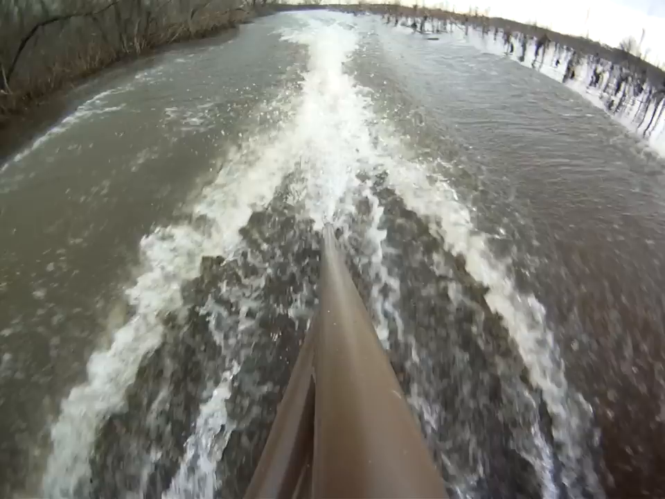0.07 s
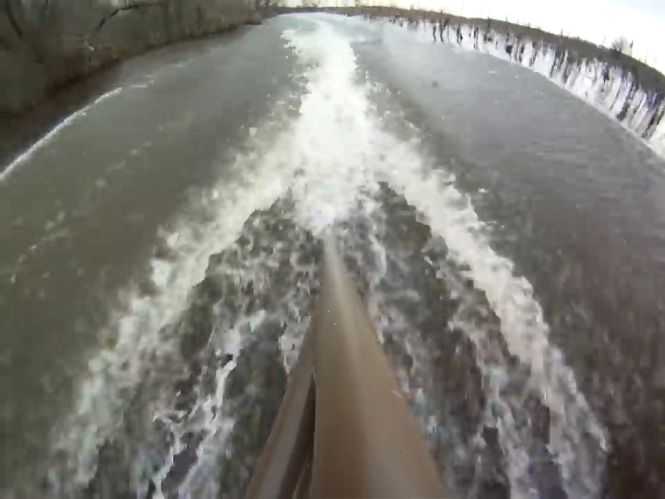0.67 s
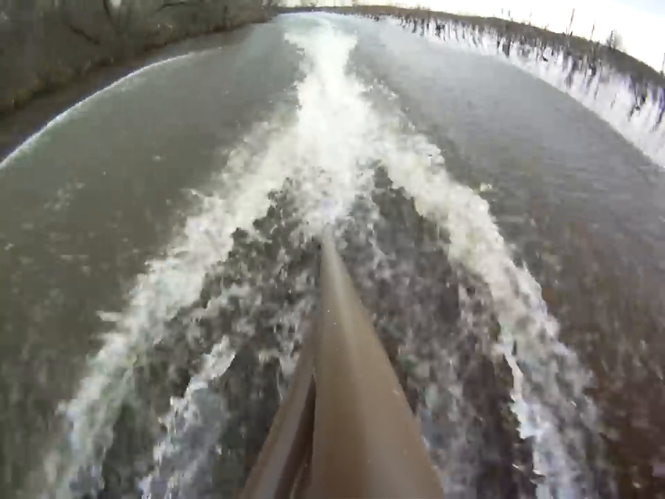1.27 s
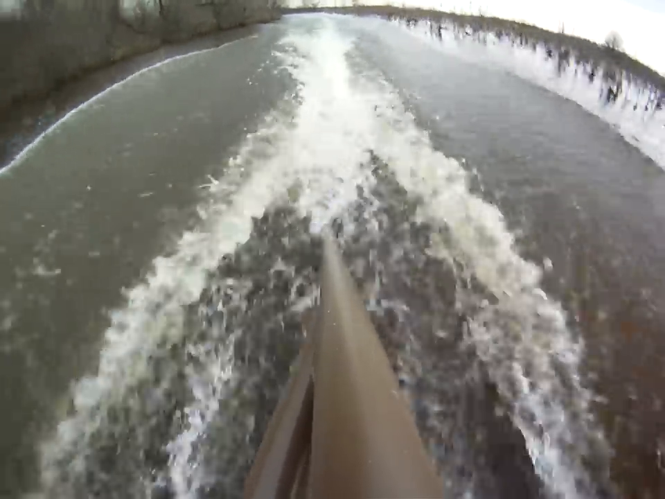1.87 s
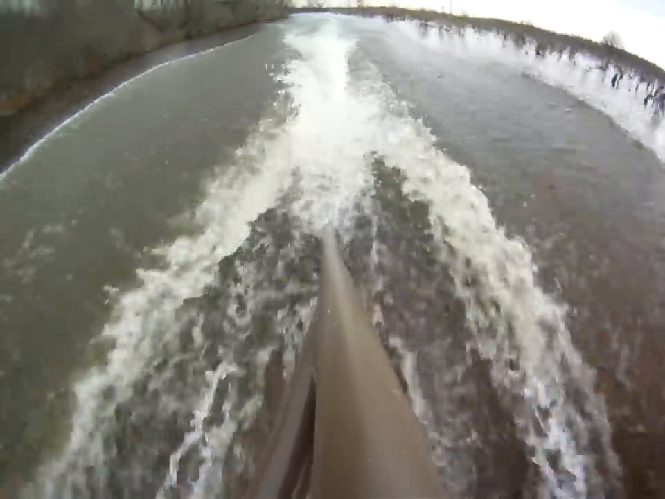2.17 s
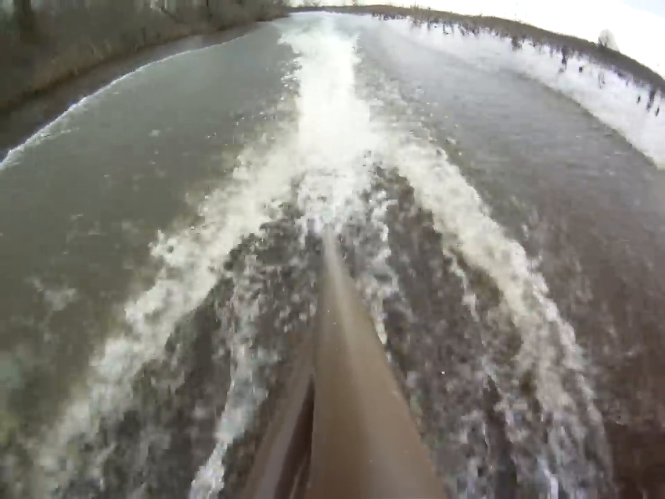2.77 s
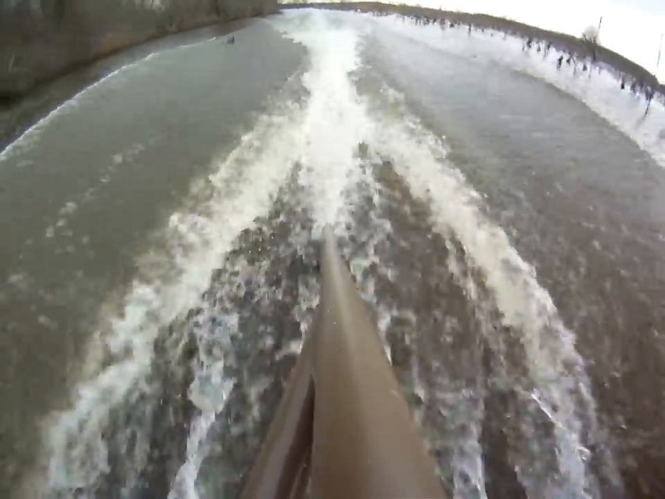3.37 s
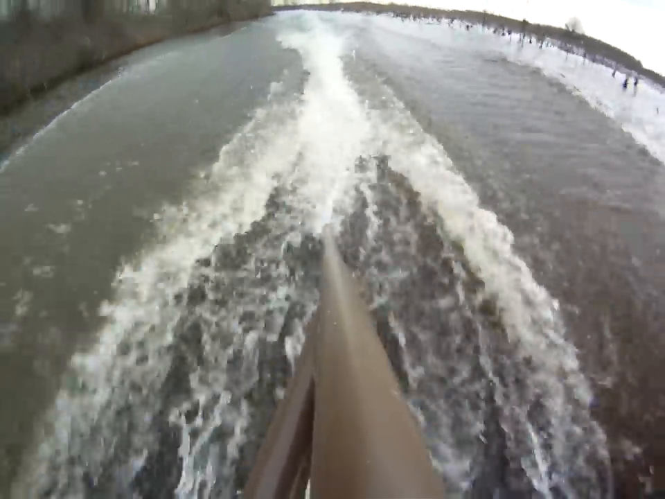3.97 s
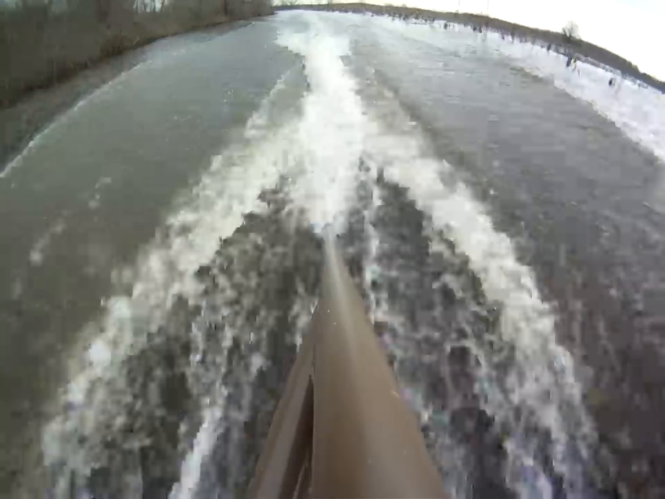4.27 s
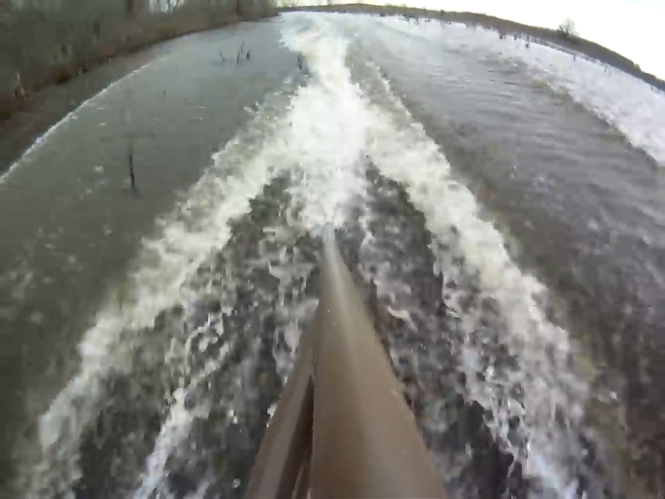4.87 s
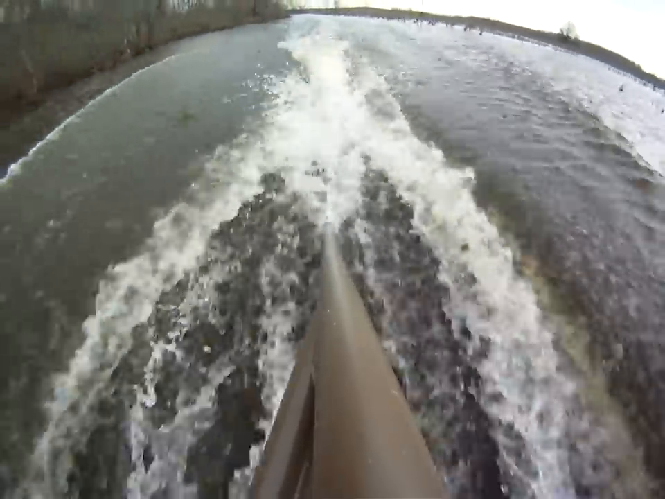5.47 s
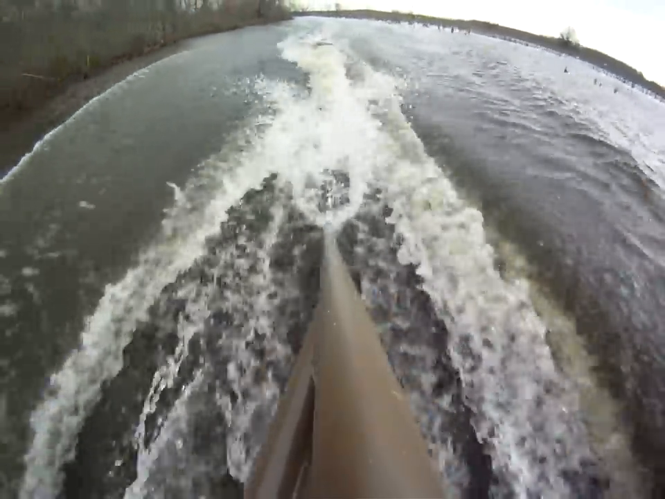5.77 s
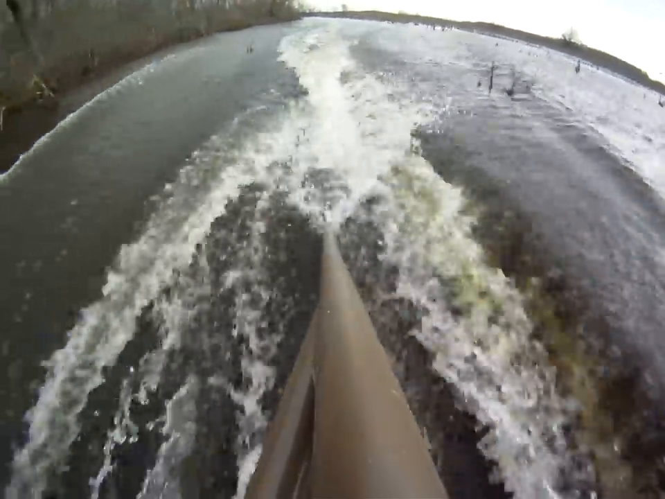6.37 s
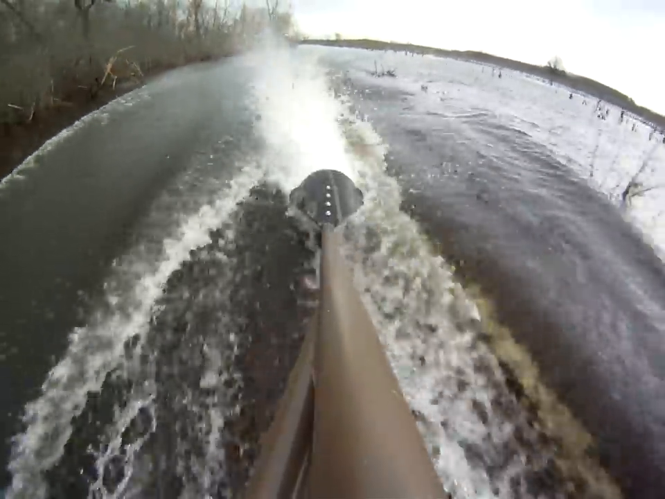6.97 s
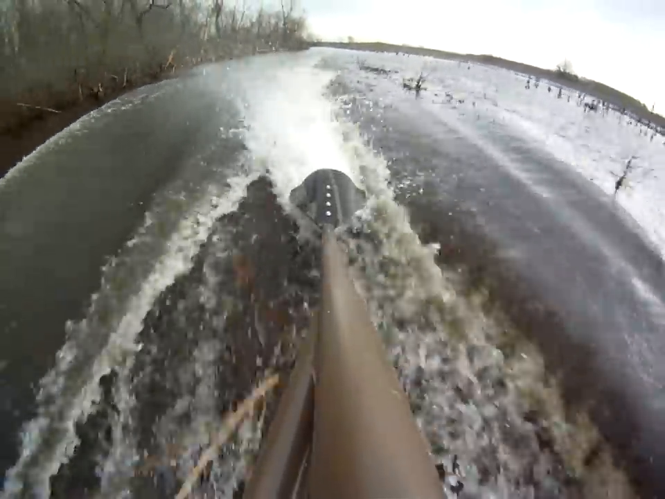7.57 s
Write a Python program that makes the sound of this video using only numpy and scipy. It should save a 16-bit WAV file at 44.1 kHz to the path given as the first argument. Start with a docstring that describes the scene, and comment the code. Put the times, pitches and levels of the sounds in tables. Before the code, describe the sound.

Heard from a microphone fixed to the propeller shaft, a boat engine drones steadily outdoors, its rapid thumping mixed with rattling metal, churning water and a thin high fizz. Late on, the propeller comes up to the surface and partly out: the deep water rumble falls away, the engine speed dips and wobbles a little, and the sound turns thinner, with more metallic ringing.

```python
"""A V-twin mud motor drives a boat over shallow flooded ground, heard from a cased camera on its tail shaft.
From the start, uneven firings drone and thump through the frame, valves and bearings clatter into the
tube and case, and the propeller churns. At 5 to 5.7 s it rises to the surface and the water rumble fades.
By 6.9 s it is half out: the thump is weaker, the shaft shakes and rings.
Throughout, the camera's slow sample-and-hold adds a fizz."""
import sys
import numpy as np
from scipy import signal
from scipy.fft import rfft, irfft, next_fast_len
from scipy.io import wavfile
from scipy.ndimage import uniform_filter1d

SR = 44100
rng = np.random.default_rng(int(sys.argv[2]) if len(sys.argv) > 2 else 0)


def wav_out(sig):
    """Save sig, one row per channel (or a flat mono array), as 16-bit PCM at SR to the path in sys.argv[1]."""
    wavfile.write(sys.argv[1], SR, np.round(np.clip(np.atleast_2d(sig).T, -1, 1) * 32767).astype(np.int16))


N = 336042
T = np.arange(N) / SR
MAX_CYCLES = 200

# propeller height: time_s, lift (0 deep, 1 at the surface, 2 half out)
PROP_LIFT = [(0, 0.075), (5.0, 0.04), (5.7, 1.1), (6.55, 1.08), (6.85, 1.878), (7.62, 1.93)]
# shaft tube and camera case resonances: pitch_hz, width_hz, level_db
TUBE_MODES = [(463, 56, -7.5), (622, 130, -2), (727, 175, 1), (839, 104, -1), (950, 83, -6), (1092, 97, -5),
              (1250, 260, -11.5), (1393, 103, -1), (1516, 105, 1), (1668, 81, 0), (1726, 56, 2),
              (1845, 45, 0.5), (1909, 110, -2), (1979, 202, -2.5), (2273, 85, -7.5), (2370, 176, -7),
              (2604, 174, -7), (3050, 120, -18), (3210, 210, -18), (3593, 307, -12), (3847, 126, -14),
              (4067, 176, -15.5), (4360, 160, -27.5)]
# broad response between them: frequency_hz, level_db
CASE_RESPONSE = [(30, -29), (110, -32.5), (200, -1), (400, -8.5), (1300, -7.5), (2150, -28.5), (2880, -46),
                 (4200, -53), (4800, -36.5), (5900, -41)]


def combustion(cycle):
    """Pressure pulses of two unevenly spaced cylinders; burn strength varies."""
    # firings: angle_cycles, level_db
    cylinders = [(0.341, -2), (.715, -3.5)]
    burn = scatter(spread_db=2.0)
    return sum(blows(cycle, angle, undb(db) * burn * scatter(spread_db=1.5), jitter_ms=.3)
               for angle, db in cylinders)


def drone(cycle):
    """Engine tones that crest together after the stronger firing and change with lift."""
    # tones: cycle_multiple (rounded on use), deep_db, surface_db, half_out_db
    tones = [(6, -33.5, -45, -48), (7, -38.5, -46, -56), (8, -37, -28, -26), (10, -23.5, -43, -51),
             (11, -23, -34.5, -36), (12, -27, -21, -28.5), (13, -31, -22.5, -42), (16, -41, -37.5, -50),
             (26, -50, -56, -35), (27, -34.5, -33, -54), (32, -32, -62, -31), (34, -48, -46, -34),
             (42, -54, -51, -30), (59, -37, -44, -37), (63.5, -37, -43, -34), (65.9, -40, -35, -29),
             (72, -34, -36, -45)]
    slip_cycles = 0.00075 * walk(14)
    angle_cycles = cycle - .41 + slip_cycles
    throb_db = surge(14, spread_db=0.7)
    out = 0
    for multiple, *levels_db in tones:
        level_db = by_lift(levels_db) + throb_db + 1.6 * walk(14)
        blur_rad = 0.058 * np.sqrt(multiple) * walk(14)  # crank slip blurs high tones most
        out = out + undb(level_db) * np.cos(2 * np.pi * round(multiple) * angle_cycles + blur_rad)
    return np.sqrt(2) * out


def thump(firings):
    """Each firing knocks the frame; a short rumble of exhaust gas follows."""
    # frame resonances: pitch_hz, width_hz, level_db
    frame_modes = [(71.4, 40, -15), (175, 79, -14), (248.3, 36, -.5), (272.8, 39, 3), (321, 36, -5),
                   (387, 117, -19)]
    # thump weight: deep_db, surface_db, half_out_db
    weight_db = [-22, -25, -30.5]
    gas = fade(firings, ms=6.6) * rng.standard_normal(N)
    frame = ring(undb(-7.5) * unit(firings) + unit(gas), frame_modes)
    return steady(frame, window_s=0.08) * undb(by_lift(weight_db) + surge(22, spread_db=1.8))


def clatter(cycle, firings, contact_count=64):
    """Valve knocks, recurring bearing contacts and a rattle after each firing ring the tube."""
    # valve gear knocks: angle_cycles, level_db
    valves = [(.005, -4.5), (.315, -2), (0.638, -4.5)]
    knocks = sum(blows(cycle, angle, undb(db) * scatter(spread_db=1.0), jitter_ms=0.22)
                 for angle, db in valves)
    knocks = fade(knocks, ms=3.3) * rng.standard_normal(N)
    # hard steel contacts are brighter
    knocks = unit(signal.sosfilt(signal.butter(1, 3000, "high", fs=SR, output="sos"), knocks))
    contacts = zip(rng.random(contact_count), rng.choice([-1, 1], contact_count))
    bearings = sum(blows(cycle, angle, np.full(MAX_CYCLES, sign), jitter_ms=.09)
                   for angle, sign in contacts)
    rattle_envelope = fade(fade(firings, ms=11.5), ms=1.27)
    rattle = unit(rattle_envelope * rng.standard_normal(N))
    force = rattle + undb(-1.5) * unit(bearings) + undb(1.2) * knocks
    return steady(ring(force * undb(0.55 * walk(40)), TUBE_MODES, CASE_RESPONSE), window_s=0.082)


def churn(pops_per_s=4000):
    """The propeller tears the water; collapsing bubbles sound up the tube."""
    pops = rng.standard_normal(N) * (rng.random(N) < pops_per_s / SR)
    pops *= undb(2.3 * np.minimum(rng.exponential(size=N), 3))
    return unit(ring(pops * undb(0.71 * walk(35)), TUBE_MODES, CASE_RESPONSE))


def shaft_shake(cycle):
    """Unbalance shakes the shaft once and twice per crank turn."""
    # once-per-turn shake: time_s, level_db
    shake_level = [(0.06, -31), (0.54, -29), (0.63, -36), (0.9, -23), (1.05, -29), (2.78, -24), (2.9, -28),
                   (3.2, -22), (3.43, -36), (3.68, -27), (3.87, -31.5), (5.87, -27.5), (6.06, -31),
                   (6.23, -20), (6.48, -31.5), (6.61, -18.5), (7.6, -20), (7.62, -18)]
    # twice-per-turn hum: time_s, level_db
    hum_level = [(0, -33.5), (3.0, -31.5), (3.5, -35.5), (4.9, -44), (5.5, -37), (6.4, -38), (6.8, -43),
                 (7.62, -40)]
    shake_db, = curves(shake_level)
    hum_db, = curves(hum_level)
    crank_rad = 4 * np.pi * cycle
    shake = undb(shake_db + surge(18, spread_db=2)) * np.sin(crank_rad)
    hum = undb(hum_db + 1.5 * walk(10)) * np.sin(2 * crank_rad)
    return np.sqrt(2) * (shake + hum)


def shaft_ring(firings):
    """Firings ring the shaft, louder as it leaves the damping water."""
    # free shaft modes: pitch_hz, width_hz, level_db
    shaft_modes = [(985, 123, -6), (1107, 120, -7), (1403, 160, -2.5), (1510, 79, -1.5), (1717, 70, -4)]
    rattle = fade(firings, ms=13) * rng.standard_normal(N)
    return steady(ring(rattle, shaft_modes), window_s=0.081) * undb(by_lift([-42, -31, -20.7]))


def wash():
    """Turbulent water buffets the skeg while it runs deep."""
    # water rumble: time_s, level_db
    rumble_level = [(0, -28), (3.0, -26.5), (4.0, -28.5), (5.0, -30.5), (6.0, -33.5), (7.0, -39),
                    (7.62, -45)]
    # submerged skeg resonances: pitch_hz, width_hz, level_db
    skeg_modes = [(50, 47, -9.5), (149, 23, -1.5), (183, 57, 3.5), (220, 66, -1)]
    rumble_db, = curves(rumble_level)
    return unit(ring(rng.standard_normal(N), skeg_modes)) * undb(rumble_db)


def surge(rate_hz, spread_db):
    """Brief swells in dB from the propeller's uneven bite; they calm as it lifts."""
    lift, = curves(PROP_LIFT)
    swells = walk(rate_hz)
    swells = unit(swells - uniform_filter1d(swells, SR // 2))
    return spread_db * np.exp(-.35 * lift) * np.minimum(swells, 1.3)


def by_lift(levels_db):
    """Level moving between its deep, surface and half-out values."""
    lift, = curves(PROP_LIFT)
    return np.interp(lift, np.arange(3), levels_db)


def ring(x, modes, broad=None):
    """Steep resonances over an optional broad response; minimum phase, so blows ring on."""
    bin_hz = np.arange(4097) * SR / 8192
    power = 1e-7 + sum(undb(2 * db) / (1 + (2 * (bin_hz - hz) / width_hz) ** 2) ** 2
                       for hz, width_hz, db in modes)
    if broad is not None:
        hz, db = np.transpose(broad)
        power = power + undb(2 * np.interp(np.log(bin_hz + 1), np.log(hz), db))
    cepstrum = irfft(np.log(power) / 2)
    causal_fold = 1 + np.sign(len(bin_hz) - 1 - np.arange(len(cepstrum)))
    causal_fold[0] = 1
    impulse = irfft(np.exp(rfft(cepstrum * causal_fold)))
    return signal.fftconvolve(x, impulse)[:N]


def blows(cycle, angle_cycles, sizes, jitter_ms):
    """One click per engine cycle, slightly early or late."""
    due_s = np.interp(np.arange(len(sizes)) + angle_cycles, cycle, T, left=-1, right=-1)
    at = (due_s + jitter_ms / 1000 * rng.standard_normal(len(sizes))) * SR
    inside = (at > 0) & (at < N - 1)
    return np.bincount(at[inside].astype(int), sizes[inside], N)


def fade(x, ms):
    """Exponential tail on each click."""
    return signal.lfilter([1], [1, -np.exp(-1000 / (ms * SR))], x)


def scatter(spread_db):
    """Capped random gain per engine cycle."""
    return undb(spread_db * np.minimum(rng.standard_normal(MAX_CYCLES), 1.4))


def walk(rate_hz):
    """Random levels joined by ramps; rms 1."""
    step = int(SR / rate_hz)
    return unit(uniform_filter1d(np.repeat(rng.standard_normal(2000), step)[:N], step))


def steady(x, window_s):
    """Even out slow swells; rms 1."""
    return x / np.sqrt(uniform_filter1d(x ** 2, int(window_s * SR)) + 1e-9)


def curves(table):
    """Table columns interpolated to every sample."""
    time_s, *columns = np.transpose(table)
    return [np.interp(T, time_s, column) for column in columns]


def undb(db):
    """Decibels to gain."""
    return 10 ** (np.asarray(db) / 20)


def unit(x):
    """Scale to rms 1."""
    return x / np.sqrt(np.mean(x ** 2))


def scene():
    """The engine cycle, two crank turns, times the motor; load and lift weight the mix."""
    # crankshaft speed: time_s, rotation_hz
    crank_speed = [(0.06, 48.01), (0.94, 48.75), (1.74, 48.23), (2.21, 49.12), (3.53, 47.82), (3.66, 48.26),
                   (5.28, 47.56), (5.43, 45.82), (5.51, 46.2), (5.79, 44.21), (5.95, 45.13), (6.1, 44.6),
                   (6.19, 46.27), (6.27, 46.8), (6.54, 44.07), (6.88, 48.5), (7.26, 46.05), (7.62, 46.14)]
    # gains under load: time_s, churn_db, clatter_db, drone_db
    load = [(0, -23, -18.7, 0.5), (.6, -21, -18, -0.5), (1.3, -21.5, -18, 1), (1.65, -23.7, -19.5, -0.5),
            (3.0, -22, -18, -0.5), (3.6, -20.7, -18.6, 0.5), (4.3, -21, -17.4, 1), (4.9, -21.5, -18.5, 1.5),
            (5.4, -20.8, -16.5, -.5), (5.85, -20, -16.5, -0.5), (6.25, -22.3, -18, 1.5),
            (6.6, -21, -18.5, 1), (7.2, -22.5, -15, -1), (7.62, -24, -16.5, 1)]
    crank_hz, = curves(crank_speed)
    churn_db, clatter_db, drone_db = curves(load)
    cycle = np.cumsum(crank_hz) / SR / 2 - .12
    firings = combustion(cycle)
    tube = clatter(cycle, firings) + undb(-5) * churn()
    # low tube resonances follow the propeller's bite, high ones the clatter
    low = signal.sosfiltfilt(signal.butter(3, 1100, fs=SR, output="sos"), tube)
    metal = unit(low) * undb(churn_db + .5 + surge(18, spread_db=1.26))
    metal += unit(tube - low) * undb(clatter_db - 0.31 + surge(11, spread_db=0.75))
    metal = metal * undb(by_lift([0, -.3, -1.8])) + shaft_ring(firings)
    exhaust = drone(cycle) * undb(drone_db) + thump(firings)
    return (exhaust + metal + shaft_shake(cycle) + wash())[None]


def record(dry):
    """The camera rounds peaks and holds slow samples, mirroring the sound as fizz around the hold rate."""
    start_s, fade_in_s = .037, 0.017
    hold_hz, top_hz = 12000, 15300
    sound = dry * np.clip((T - start_s) / fade_in_s, 0, 1)
    rounded = sound / (1 + (sound / .95) ** 6) ** (1 / 6)
    slow = signal.resample_poly(rounded, hold_hz, SR, axis=1)
    held = signal.resample_poly(np.repeat(slow, 4, axis=1), SR, 4 * hold_hz, axis=1)[:, :N]
    soft = signal.sosfilt(signal.butter(1, 17500, fs=SR, output="sos"), held)
    return signal.sosfilt(signal.ellip(10, .2, 70, top_hz, fs=SR, output="sos"), soft)


dry = scene()
out = record(dry)
wav_out(out)
```